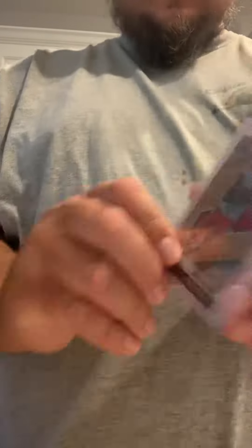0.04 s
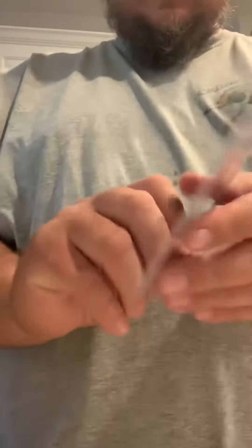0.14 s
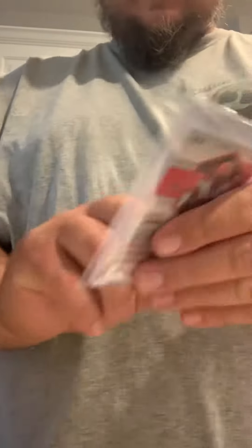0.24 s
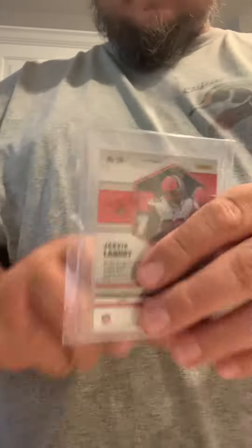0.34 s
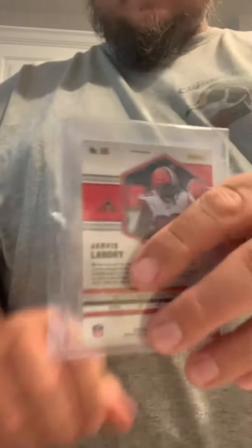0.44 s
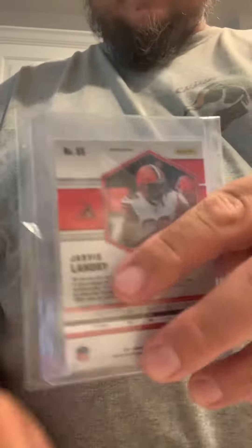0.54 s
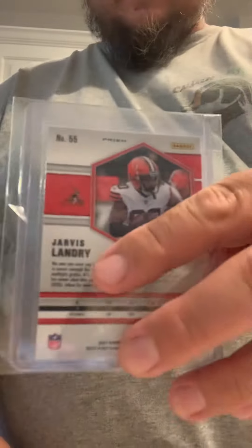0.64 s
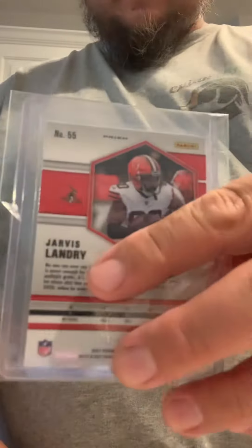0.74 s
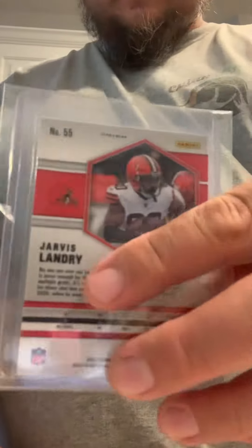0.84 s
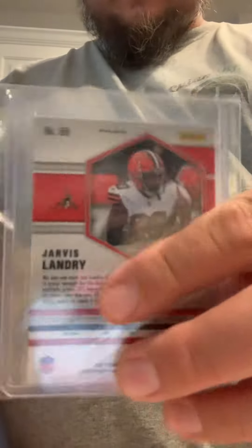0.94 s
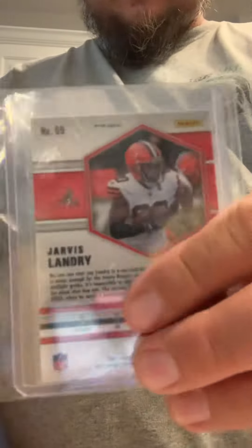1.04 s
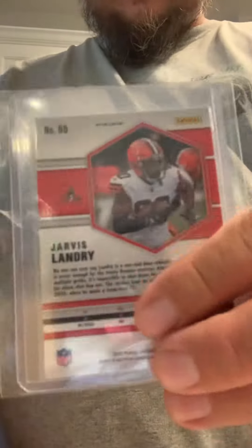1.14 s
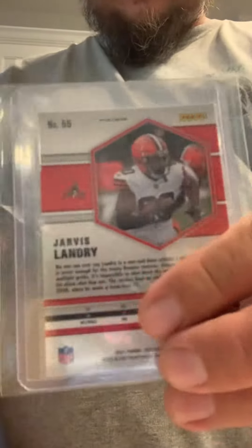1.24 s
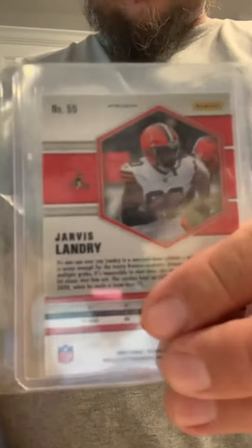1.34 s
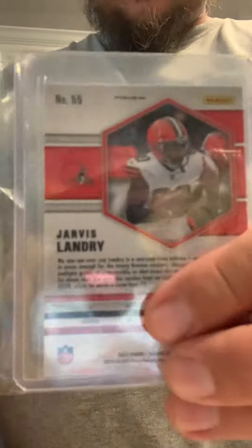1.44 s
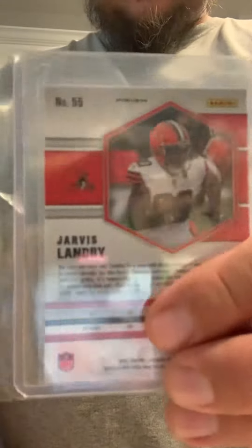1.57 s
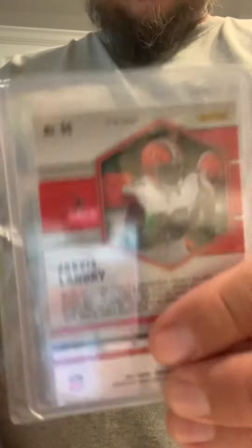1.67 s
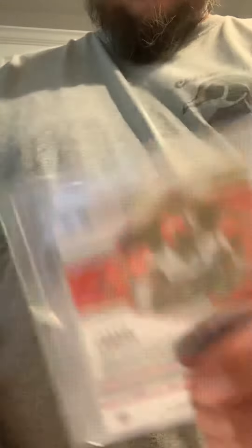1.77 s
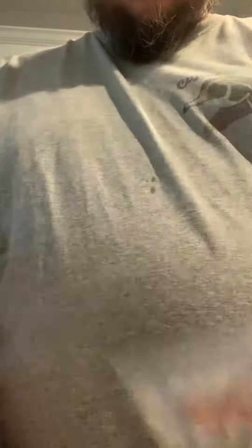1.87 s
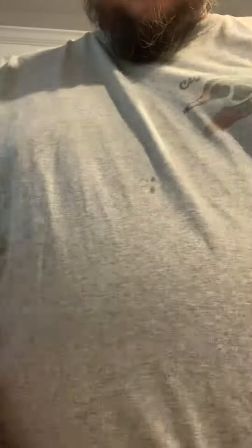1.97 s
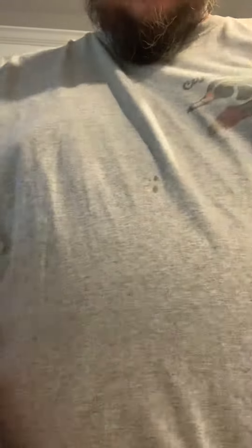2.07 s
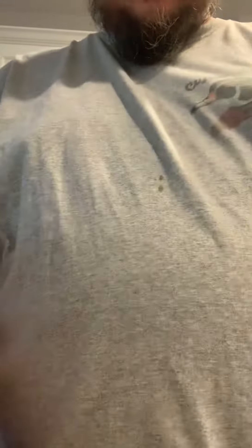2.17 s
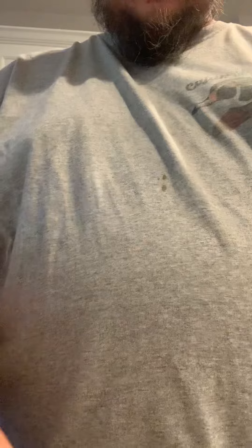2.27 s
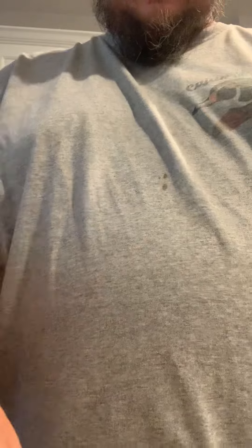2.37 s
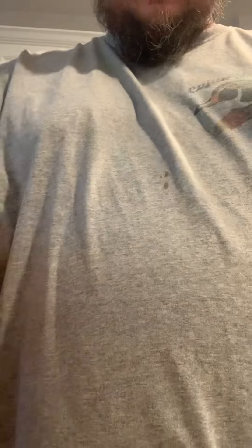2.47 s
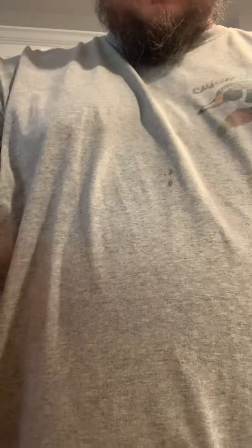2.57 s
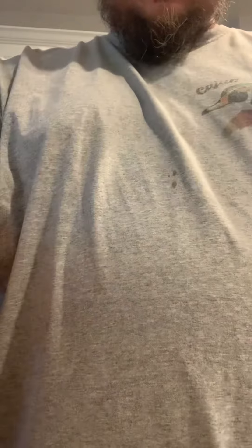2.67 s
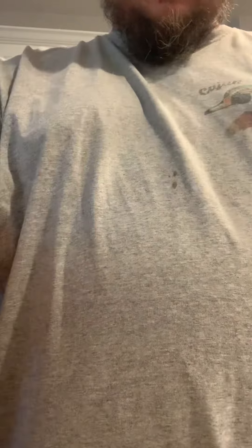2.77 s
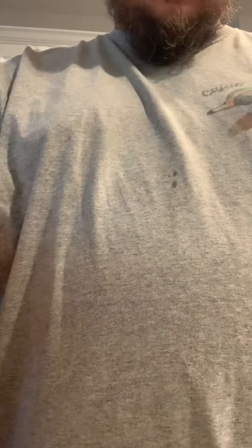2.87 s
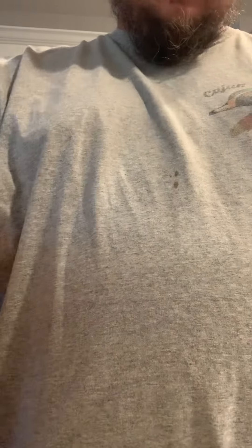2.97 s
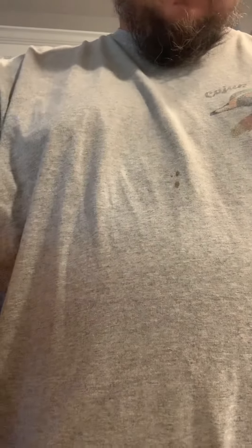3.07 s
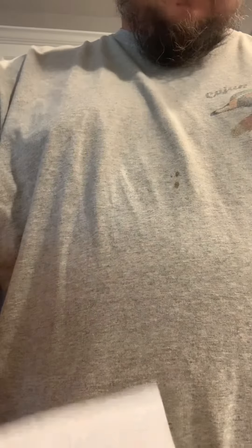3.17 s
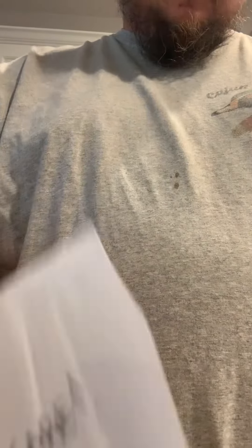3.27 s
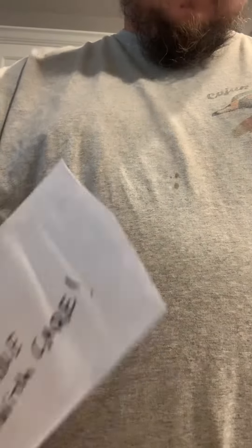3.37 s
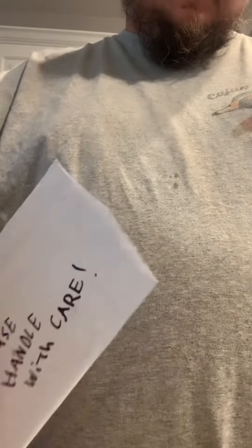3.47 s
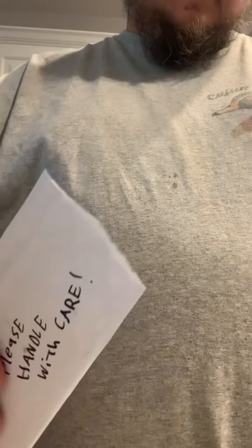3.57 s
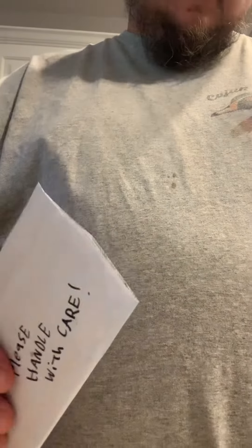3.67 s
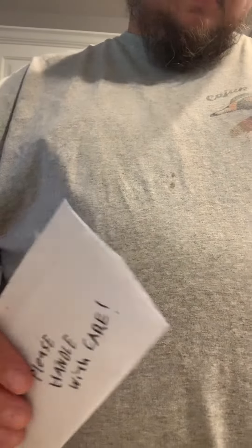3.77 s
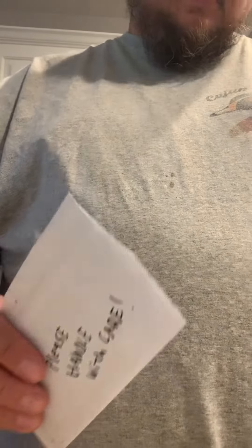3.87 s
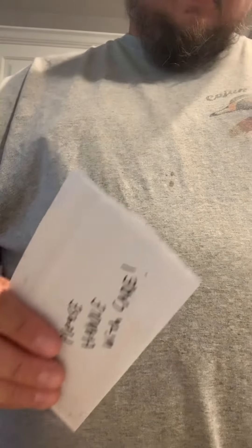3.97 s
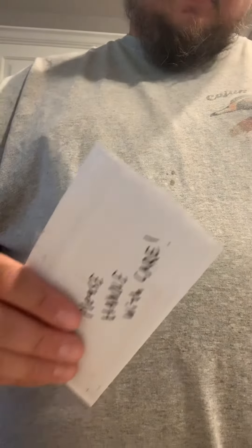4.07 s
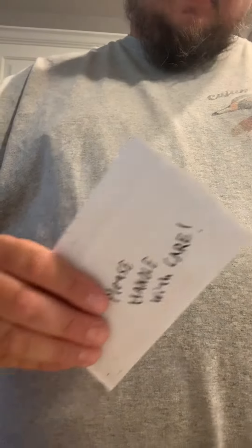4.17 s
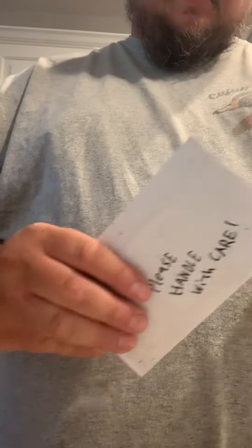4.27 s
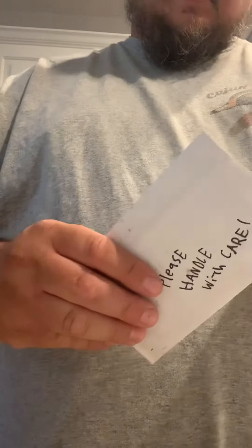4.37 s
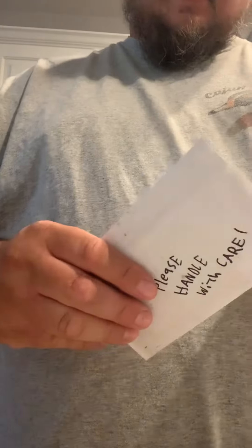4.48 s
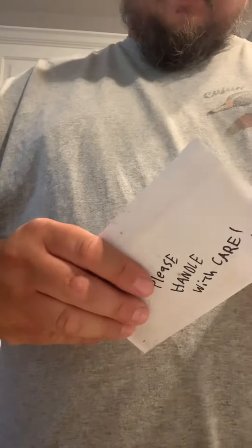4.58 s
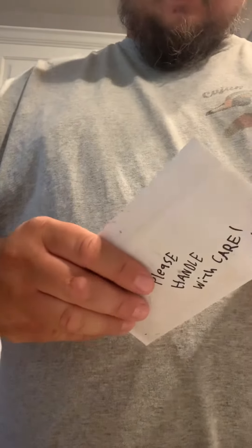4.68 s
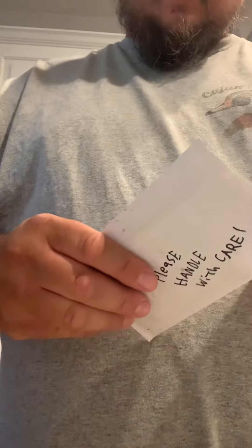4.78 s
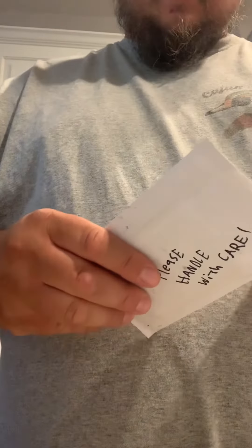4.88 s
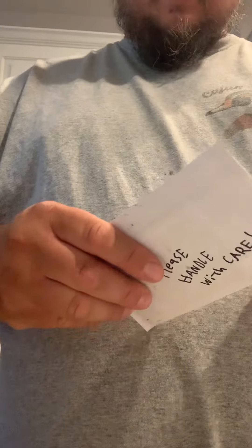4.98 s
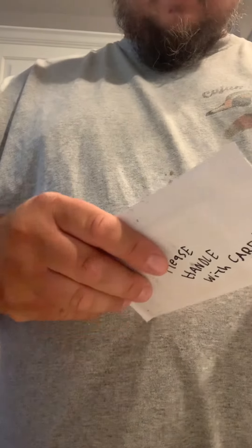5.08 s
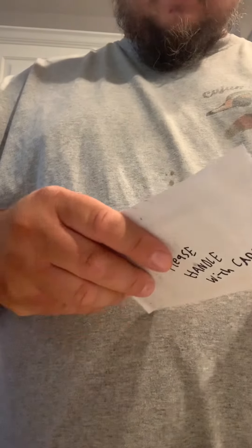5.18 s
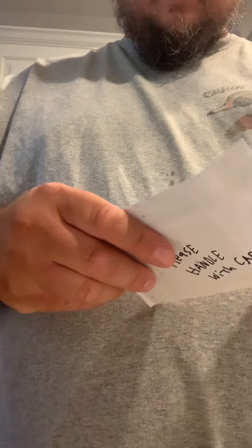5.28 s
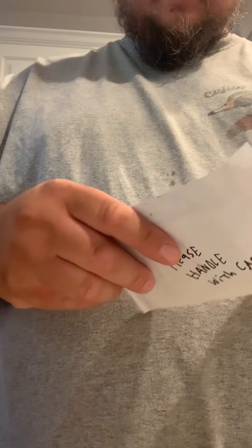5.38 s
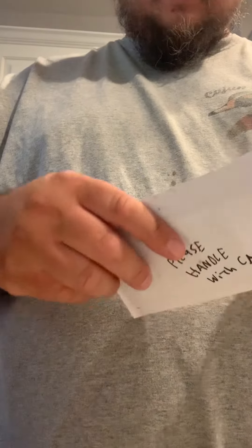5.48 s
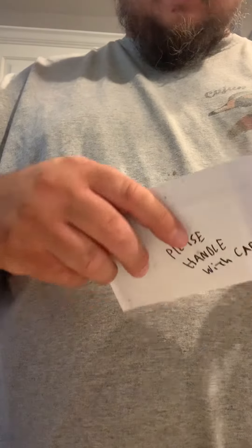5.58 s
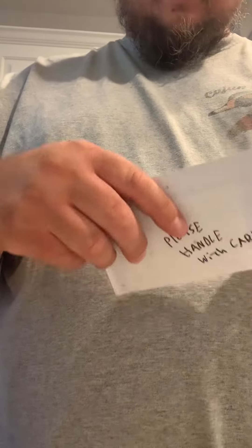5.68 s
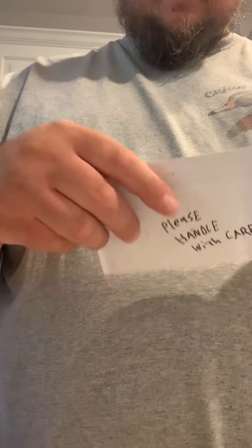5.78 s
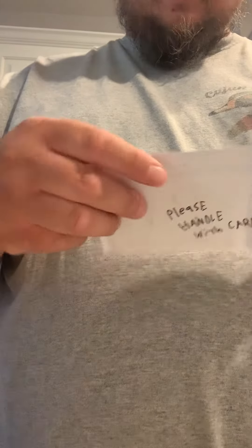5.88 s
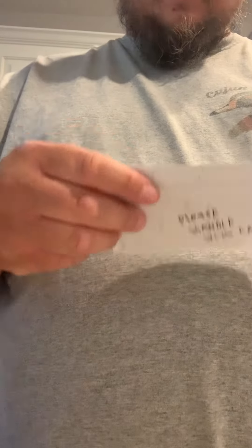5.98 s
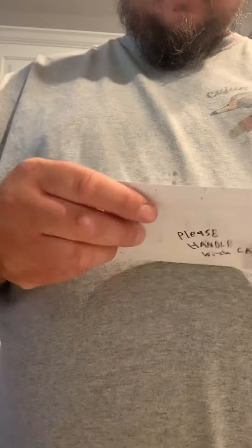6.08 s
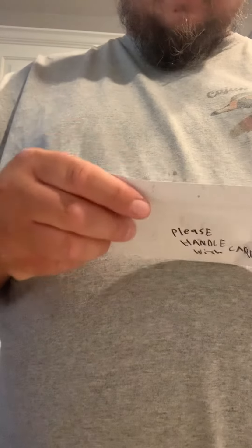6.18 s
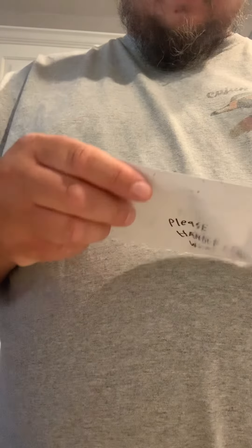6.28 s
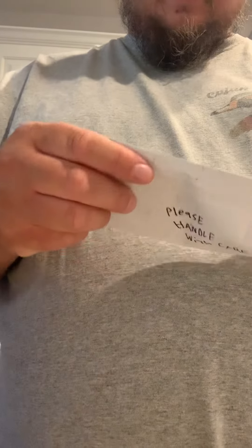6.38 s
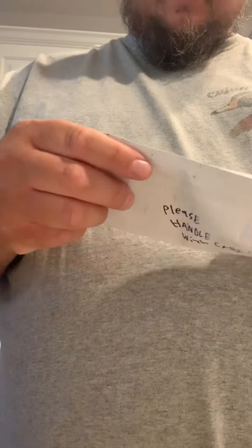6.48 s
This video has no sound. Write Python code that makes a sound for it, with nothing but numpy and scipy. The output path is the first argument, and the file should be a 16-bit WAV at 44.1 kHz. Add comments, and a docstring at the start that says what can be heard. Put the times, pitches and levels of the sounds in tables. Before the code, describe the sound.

Handheld phone close to the hands, indoors. Quick small plastic clicks come first, then near silence and a faint put-down bump. Paper rustles and slides as an envelope is lifted, then pauses with only tiny ticks. Finally the stiff paper crackles, scrapes and pops much louder, cut off mid-crinkle. Soft air noise and a faint low hum, very short room reverberation.

```python
"""Close to a phone in a quiet room, hands turn a card in a stiff plastic sleeve (hiss, sharp ticks) and put it down.
They pick up a paper envelope, slide along it, then start to pull it open: friction noise under stroke gains,
snaps built of crack, flex and ring, and random small buckles for crackle.
Soft bumps (resonant noise plus a damped push), wall reverberation and a low hum with air noise lie beneath."""
import sys
import numpy as np
from scipy import signal
from scipy.fft import rfft, irfft, next_fast_len
from scipy.io import wavfile
from scipy.ndimage import uniform_filter1d, map_coordinates

SR = 44100
rng = np.random.default_rng(int(sys.argv[2]) if len(sys.argv) > 2 else 0)


def store_pcm(level_fs):
    """Save levels as 16-bit WAV."""
    pcm = np.round(np.clip(level_fs, -1, 1) * 32767).astype(np.int16)
    wavfile.write(sys.argv[1], SR, np.atleast_2d(pcm).T)


N = 287532

# Stroke, snap and room levels are before trims; bump peaks have none. Spectra are relative.
# taut envelope modes: f/Hz, width/Hz, level/dB
ENVELOPE_MODES = [(85, 87, -8), (186, 270, -6.5), (397, 130, -2), (766, 250, -3.5), (1290, 250, -2.5),
                  (1785, 290, -3.5), (1995, 260, -1), (2480, 530, -2), (3530, 1470, -5)]
# grips on the envelope: start t/s, mode frequency scale, bulge f/Hz, bulge level/dB, rustle trim level/dB
GRIPS = [(5.26, 1.01, 1900, 5.5, -1.5), (5.78, 1.0, 1290, -1.5, -1), (6.245, 1.029, 1690, 6, -1.5)]
# finger strokes on envelope, on sleeve: start t/s, length t/s, hiss level/dB, rustle level/dB, swell over stroke/dB
PAPER_STROKES = [(2.49, 0.03, -62, -59.5, 17), (2.548, 0.043, -56, -51, 17.5),
                 (2.585, .14, -59.5, -54.5, -20), (2.74, 0.09, -65.5, -53, 19),
                 (2.84, 0.21, -61, -57.5, 21), (3.06, 0.098, -52, -53.5, 6.5),
                 (3.17, 0.041, -51.5, -56, 11.5), (3.22, 0.17, -55, -57, -0.5),
                 (3.41, 0.2, -57.5, -64, 1.5), (3.56, 0.05, -49, -56, 4), (3.62, 0.13, -54.5, -53, -3.5),
                 (3.76, 0.2, -56, -55.5, 3), (4.29, 0.062, -80, -65.5, 21), (4.465, 0.028, -63, -59, -3.5),
                 (4.6, 0.037, -70, -61.5, -3), (4.764, 0.015, -66, -61.5, 0), (4.92, 0.33, -70, -68, 3),
                 (5.265, 0.088, -60.5, -60.5, 25.5), (5.355, 0.12, -53, -50, 0), (5.5, .15, -54.5, -55, -4),
                 (5.7, 0.11, -59.5, -65.5, 5), (5.806, 0.068, -48, -53.5, -23),
                 (5.885, 0.075, -48.5, -54, -0.5), (5.955, 0.025, -42.5, -44.5, 15),
                 (5.997, 0.095, -49.5, -48, -3), (6.1, 0.058, -47, -43.5, 0),
                 (6.17, 0.059, -52, -51.5, -5.5), (6.257, 0.047, -41, -40.5, 0),
                 (6.31, 0.061, -52.5, -48.5, -3.5), (6.397, 0.11, -56.5, -52, 1),
                 (6.476, 0.029, -38, -31.5, 6.5)]
SLEEVE_STROKES = [(0.0, 0.025, -55, -50, -9.5), (.055, 0.073, -62.5, -57.5, 7),
                  (.14, 0.083, -67.5, -64.5, -2), (.21, 0.042, -55.5, -58.5, 7),
                  (.26, 0.085, -66, -70.5, -10), (.41, 0.048, -74.5, -75.5, 7),
                  (.54, 0.085, -71, -74.5, -4), (.89, 0.035, -64.5, -84, 1),
                  (.95, 0.067, -67.5, -78.5, 10.5), (1.58, 0.11, -74.5, -75, 13.5),
                  (1.745, 0.057, -67, -79, 3), (1.805, 0.043, -58.5, -71, 9), (2.04, 0.2, -72.5, -72, 8),
                  (2.245, 0.19, -64, -62.5, 0)]
# paper buckles, the first two rows being last ticks of the sleeve: t/s, crack level/dB, flex level/dB, flex
# f/Hz, sheet ring level/dB, crack t60/s
PAPER_SNAPS = [(2.497, -48, -70, 3000, -70, 0.015), (2.5075, -46, -47, 3720, -64, 0.012),
               (2.521, -45, -58, 1290, -56, 0.006), (2.5805, -54, -34, 2380, -51, .008),
               (2.6325, -45, -43, 1010, -53, 0.0072), (2.7285, -70, -51.5, 1070, -51, .008),
               (3.031, -39, -52, 1700, -52, .005), (3.052, -62, -42.5, 1120, -47, .008),
               (3.213, -48, -42.5, 2300, -50, 0.0029), (3.3544, -39, -52, 2560, -71, 0.0065),
               (3.738, -60, -56, 1291, -42, 0.0056), (4.4529, -51.5, -70, 2501, -70, 0.0035),
               (4.7771, -38, -55, 1570, -57, 0.0044), (5.375, -40, -47, 2400, -43, 0.011),
               (5.386, -48, -40, 2020, -44, 0.0091), (5.4725, -57, -49, 1310, -40, 0.0066),
               (5.489, -61, -46, 1900, -38.5, 0.0055), (5.5117, -56, -41, 856, -37.5, .008),
               (5.527, -60, -52, 1510, -35.5, 0.009), (5.552, -56, -52, 1900, -54, .005),
               (5.608, -45, -46, 1650, -41.5, 0.0059), (5.653, -68, -64, 1800, -44, 0.0067),
               (5.6748, -64, -36.5, 580, -46, 0.005), (5.803, -32, -31, 1230, -34, 0.0084),
               (5.8096, -19.5, -30, 3160, -27.5, 0.022), (5.8198, -16.5, -23, 3000, -28, 0.0053),
               (5.9765, -28.5, -36, 3000, -43, .008), (5.9809, -14, -21, 2150, -24.5, 0.0078),
               (5.9922, -6.5, -22, 2440, -22.5, 0.011), (6.1281, -41, -27.5, 2030, -42, .01),
               (6.161, -44.5, -36, 1390, -36.5, .008), (6.2489, -35.5, -36, 2530, -41, 0.015),
               (6.274, -27, -36, 1900, -34, 0.012), (6.294, -45, -40, 1900, -27.5, 0.0089),
               (6.3072, -32, -18.5, 1470, -28.5, .008), (6.3095, -31, -28.5, 1670, -31, 0.011),
               (6.467, -41, -15, 1600, -33.5, 0.0097), (6.5008, -44, -22, 2000, -35, .008)]
# sleeve ticks on fingers and card: t/s, crack level/dB, flex level/dB, flex f/Hz, crack t60/s
SLEEVE_TICKS = [(.0544, -44, -43.5, 2260, 0.0097), (.0929, -45, -44, 1410, 0.014),
                (0.1257, -54, -47, 2020, 0.012), (0.2107, -36, -40.5, 2550, .006),
                (0.239, -44, -41.5, 2880, 0.0096), (0.2511, -36, -43, 3070, 0.0083),
                (0.2709, -34.5, -44, 2720, 0.0086), (.546, -71, -55, 860, .008),
                (0.6138, -75, -59, 2050, 0.0084), (0.8073, -66, -62, 2270, 0.0049),
                (0.8935, -47.5, -52, 2310, 0.0027), (1.1683, -81, -54, 2040, 0.006),
                (1.2383, -72, -87, 3000, .004), (2.1286, -51, -61, 2650, .008),
                (2.168, -59.5, -75, 2500, 0.0092), (2.3967, -37.5, -41.5, 2790, 0.0024)]
# soft bumps of hands and sheet: t/s, peak level/dB, f/Hz, t60/s
BUMPS = [(0.0, -36.5, 62, 0.061), (0.55, -46, 133, 0.35), (2.136, -46, 69.6, 0.3),
         (2.261, -52.5, 114, 0.55), (2.397, -39.5, 139, 0.055), (2.525, -50, 48.3, 0.15),
         (3.031, -51, 72.5, 0.53), (5.519, -45.5, 85, 0.38), (5.559, -42, 360, 0.13),
         (5.608, -43.5, 335, 0.04), (5.821, -41, 200, 0.061), (5.918, -36.5, 206, 0.074),
         (5.994, -28, 382, 0.07), (6.165, -33.5, 183, 0.032), (6.289, -37, 186, 0.1),
         (6.506, -43, 240, 0.069)]
# spectra of rubbed surface, paper crack, plastic crack: f/Hz, level/dB
SURFACE_SPECTRUM = [(2000, -28.5), (3500, -11), (4500, -8.5), (5300, -1.5), (6300, 2), (7500, -2),
                    (8800, 0.5), (10300, -3.5), (11200, -8), (12300, -18), (14800, -22), (16000, -23)]
PAPER_CRACK_SPECTRUM = [(300, -27), (2000, -15.5), (3000, -27), (3600, -6), (5000, -11), (6500, -7),
                        (8000, -7), (8900, -1), (9700, -5), (11000, -14), (14000, -22.5), (16000, -31)]
PLASTIC_CRACK_SPECTRUM = [(300, -36), (2500, -15.5), (4300, -12.5), (6200, -4.5), (7100, -4.5),
                          (8400, -3.5), (10300, -0.5), (11800, -7), (14000, -15), (16000, -17)]
# spectra of the loose bodies: sheet at pick-up, lifted envelope, sleeve: f/Hz, level/dB
SHEET_SPECTRUM = [(60, -2.5), (200, -8), (400, -7), (600, -2.5), (850, -6), (1080, 3), (1300, -5),
                  (1600, 4), (1900, -8.5), (2400, 1), (3000, -8.5), (3800, -8.5), (6500, -2.5),
                  (12000, -32)]
ENVELOPE_SPECTRUM = [(60, -10), (200, -10), (450, 5.5), (580, 2.5), (780, 6), (1020, -7.5), (1250, 2.5),
                     (1650, 2), (2050, 1), (2800, 4.5), (4200, -9), (12000, -42)]
SLEEVE_SPECTRUM = [(60, -11), (220, -1), (450, 2), (600, -4), (780, 0.5), (1030, -15.5), (1300, -3),
                   (1700, -5), (2300, -3), (3500, -10), (4300, -6), (12000, -30)]
# left-right likeness of loose rubbing, taut envelope, snaps (one spot), room air: f/Hz, likeness (0-1)
PAPER_ALIKE = [(200, 1), (700, 0.29), (1500, 0.1), (3500, 1), (5000, 1), (15000, 1)]
TAUT_ALIKE = [(200, 1), (700, 0.86), (1500, 0.66), (3500, 0.85), (5000, 1)]
SNAP_ALIKE = [(200, 0.98), (1500, 0.7), (5000, 0.95)]
ROOM_ALIKE = [(50, 0.93), (200, 0.6), (500, 0.052), (1500, 0.059)]
# lag of left behind right: f/Hz, lag t/s
PORT_LAG = [(400, 0.00029), (1200, 0.000076), (2400, 0.0001), (3500, 0.000065), (4600, 0.00011),
            (9000, 0.00012)]
# wall reverberation: f/Hz, t60/s
WALLS_T60 = [(200, 0.76), (2000, 0.28), (10000, 0.02)]
# ventilation spectrum: f/Hz, level/dB
AIR_SPECTRUM = [(15, -65), (25, -16), (48, -9.5), (108, -2), (146, -6.5), (188, 1.5), (253, -5), (320, -3),
                (348, -22), (387, -11.5), (579, -17), (814, -29.5), (1010, -29.5), (2250, -33), (4000, -48),
                (5200, -63), (8800, -120)]
# hum partials: f/Hz, rms level/dB
HUM = [(98.5, -82), (197, -71), (314, -78)]

REACH_S, LIFT_S = 2.47, 3.26  # envelope reached for, then lifted
ATTACK_S, RELEASE_T60_S = 0.0047, 0.11
ATTACK_SHARE = 0.031  # of stroke length, added to the attack
LET_GO_DB = 18.5  # each rising swell of this size halves the release: a loaded finger slips off at once
LEAD_S = .004  # short faint rise before each snap
FLIP_CYCLES, FLIP_SAG, FLIP_CLEAN = 0.9, 0.23, 0.41  # cycles to widest swing, pitch sag (0-1), clean power share
ROOM_DB = -67.5
TOP_HZ = 16000


def opening(gains):
    """Fingers rub the taut envelope; each grip sets its own mode scale and bulge."""
    ends_s = [row[0] for row in GRIPS[1:]] + [N / SR]
    out = np.zeros((2, N))
    for (start_s, scale, bulge_hz, bulge_db, rustle_db), end_s in zip(GRIPS, ends_s):
        sheet = taut_sheet(scale, bulge_hz, bulge_db)
        out += rub(gains, (start_s, end_s), sheet, TAUT_ALIKE, hiss_db=0.0, sheet_db=rustle_db,
                   grain_share=0.33, judder_db=1.5)
    return out


def taut_sheet(scale, bulge_hz, bulge_db):
    """Gain of a stretched sheet: power sum of a few wide modes, one range favoured."""
    def gain(f):
        power = 0
        for hz, width_hz, db in ENVELOPE_MODES:
            mode = amp(db) * resonance(f, hz * scale, hz / width_hz) ** 2
            power = power + np.abs(mode) ** 2
        bulge = amp(bulge_db * np.abs(resonance(f, bulge_hz, 2.1)) ** 2)
        return np.sqrt(power / (1 + (f / 4500) ** 4)) * bulge
    return gain


def loose_sheet(spectrum):
    """Gain of a slack sheet: a broad fixed colour."""
    return lambda f: amp(along(spectrum, f))


def pressure(strokes, resting_hiss_db, resting_sheet_db):
    """Hiss and rustle gains: attack, sloping hold and release per stroke, over the creep of a resting grip."""
    power = amp([[resting_hiss_db], [resting_sheet_db]]) ** 2 * np.ones(N)
    age_s = np.arange(min(N, SR)) / SR
    for start_s, length_s, hiss_db, sheet_db, swell_db in strokes:
        attack_s = ATTACK_S + ATTACK_SHARE * length_s
        attack = np.sin(np.pi / 2 * np.minimum(age_s / attack_s, 1)) ** 2
        hold_db = swell_db * (np.minimum(age_s / length_s, 1) - .5)
        release_t60_s = RELEASE_T60_S * 2 ** (-max(swell_db, 0) / LET_GO_DB)
        release_db = -60 * np.maximum(age_s - length_s, 0) / release_t60_s
        stroke = amp([[hiss_db], [sheet_db]]) * attack * amp(hold_db + release_db)
        add(power, start_s, stroke ** 2)
    return np.sqrt(power)


def rub(gains, span_s, sheet, alike, hiss_db, sheet_db, grain_share, judder_db):
    """Rubbing over one span: the surface hisses evenly, the sheet scrapes with sparser slips."""
    start_s, end_s = span_s
    hiss, body = gains[:, round(start_s * SR):round(end_s * SR)]
    surface = friction(len(hiss), loose_sheet(SURFACE_SPECTRUM), alike, 3000, grain_share,
                       0.45 * judder_db, patchy_db=3.0)
    scrape = friction(len(body), sheet, alike, 380, grain_share, judder_db, patchy_db=4.0)
    out = np.zeros((2, N))
    add(out, start_s, amp(hiss_db) * hiss * surface + amp(sheet_db) * body * scrape)
    return out


def friction(n, colour, alike, grain_rate_hz, grain_share, judder_db, patchy_db):
    """Fibres catch and let go: sparse slips on a dense hiss, under an unsteady finger."""
    sizes = amp(3.8 * np.clip(rng.standard_normal(n), -2, 1.5)) * rng.choice([-1, 1], (2, n))
    clumps = amp(7 * np.clip(wobble(45, n), -1.5, 1.5))  # slips come in runs
    slips = (rng.random(n) < clumps * grain_rate_hz / SR) * sizes
    share = np.clip(grain_share, 0, 1)
    drive = np.sqrt(share) * unit(slips) + np.sqrt(1 - share) * rng.standard_normal((2, n))
    judder = amp(judder_db * (wobble(60.1, n) + wobble(260, n)))
    drive = patches(drive, patchy_db) * judder
    return unit(stereo(filtered(drive, lambda f: causal(colour(f))), alike))


def patches(x, depth_db):
    """Resonances come and go: a smooth random gain over time and frequency."""
    z = signal.stft(x, nperseg=512)[2]
    field = rng.standard_normal(z.shape[1:])
    field = uniform_filter1d(field, size=3, axis=0)
    field = uniform_filter1d(field, size=7, axis=1)
    return signal.istft(z * amp(depth_db * unit(field)), nperseg=512)[1][:, :x.shape[-1]]


def snaps(table, crack_colour, sheet, flex_t60_s, ring_t60_s, rise_share, flex_q,
          crack_trim_db, flex_trim_db, ring_trim_db):
    """Each buckle: a bright crack, a hollow pop of the flipping patch, a short ring of the whole sheet."""
    out = np.zeros((2, N))
    clean = np.clip(FLIP_CLEAN, 0, 1)
    for t_s, crack_db, flex_db, flex_hz, ring_db, t60_s in table:
        rise_s = rise_share * t60_s
        crack = burst(t60_s, rise_s, lambda f: causal(amp(along(crack_colour, f))))
        rough = burst(flex_t60_s, rise_s, lambda f: resonance(f, flex_hz, flex_q) ** 2)
        flex = np.sqrt(clean) * flip(flex_hz) + np.sqrt(1 - clean) * rough
        ring = burst(ring_t60_s, rise_s, lambda f: causal(sheet(f)) / (1 + 1j * f / 1700))
        snap = amp(crack_db + crack_trim_db) * crack
        snap = snap + amp(flex_db + flex_trim_db) * flex
        snap = snap + amp(ring_db + ring_trim_db) * ring
        add(out, t_s - LEAD_S, snap)
    return out


def burst(t60_s, rise_s, response):
    """A faint rise of noise, then a sharp onset and decaying noise; energy equals rms 1 over 6 ms."""
    t = np.arange(SR // 16) / SR - LEAD_S
    after = np.maximum(t, 0)
    lead_in = amp(-19.5 + 24 * t / LEAD_S) * (t < rise_s)
    decay = amp(-60 * after / max(t60_s, .001)) * (1 - np.exp(-after / rise_s))
    noise = rng.choice([-1, 1], (2, len(t))) * (lead_in + decay)
    sound = stereo(filtered(noise, response), SNAP_ALIKE)
    return sound / np.sqrt(np.sum(sound ** 2, axis=1, keepdims=True) / (.006 * SR))


def flip(hz):
    """A patch pops through: a few swings sagging in pitch as it relaxes; energy equals rms 1 over 6 ms."""
    age = np.maximum(np.arange(SR // 16) / SR - LEAD_S, 0) * hz / FLIP_CYCLES
    pitch_hz = hz * (1 + FLIP_SAG * (2 * np.exp(-age / 2) - 1)) * (age > 0)
    swing = age * np.exp(-age) * np.sin(2 * np.pi * np.cumsum(pitch_hz) / SR)
    return swing / np.sqrt(np.sum(swing ** 2) / (.006 * SR))


def crinkles(gains, count, centre_hz, spread_octaves, spread_db, t60_s):
    """Tiny buckles at random times, levels following the rubbing gains; rows as in PAPER_SNAPS."""
    t_s = rng.uniform(REACH_S, (N - 1) / SR, count)
    size, pitch = np.clip(rng.standard_normal((count, 2)), -1.5, 1.5).T
    gains_db = 20 * np.log10(gains[:, (t_s * SR).astype(int)])
    hiss_db, sheet_db = gains_db + spread_db * size
    flex_hz = centre_hz * 2 ** (spread_octaves * pitch)
    return np.transpose([t_s, hiss_db, sheet_db, flex_hz, sheet_db, np.full(count, t60_s)])


def bumps(rise_s, blow_db):
    """Soft contacts: one dull push, plus a rumble as the hand settles."""
    out, t = np.zeros((2, N)), np.arange(SR // 3) / SR
    for t_s, peak_db, hz, t60_s in BUMPS:
        envelope = amp(-60 * t / t60_s) * (1 - np.exp(-t / rise_s))
        noise = rng.standard_normal(len(t)) * envelope
        settle = unit(filtered(noise, lambda f: resonance(f, hz, 0.76) ** 2))
        push = unit(np.sin(2 * np.pi * hz * t) * t * np.exp(-1.6 * hz * t))
        thud = settle + amp(blow_db - 20 * t60_s) * push
        add(out, t_s, amp(peak_db) * thud / np.abs(thud).max())
    return out


def ports(x):
    """Hands work a little to the right: their sound reaches the left port later."""
    sides = np.array([[-1], [1]])  # half the lag each way
    return filtered(x, lambda f: np.exp(1j * np.pi * f * along(PORT_LAG, f) * sides))


def walls(x):
    """The small room answers briefly: decaying noise, treble dying first."""
    hz, t, z = signal.stft(rng.standard_normal((2, SR // 3)), SR, nperseg=256)
    decay = amp(-60 * t / along(WALLS_T60, hz)[:, None])
    tail = signal.istft(z * decay, SR, nperseg=256)[1]
    tail = np.pad(tail, ((0, 0), (SR // 250, 0)))  # 4 ms pre-delay
    return signal.fftconvolve(x, tail / np.linalg.norm(tail[0]), axes=1)[:, :N]


def room_tone(air_db, hum_db, hiss_db, drift_rad):
    """Low ventilation noise, a phase-wavering hum and a trace of white hiss."""
    air = rng.standard_normal((2, N)) * amp(1.3 * wobble(7.6))
    air = unit(stereo(filtered(air, lambda f: amp(along(AIR_SPECTRUM, f))), ROOM_ALIKE))
    t = np.arange(N) / SR
    hum = np.zeros(N)
    for hz, db in HUM:
        tone = np.sin(2 * np.pi * hz * t + drift_rad * wobble(13.0))
        hum += amp(db + hum_db) * unit(tone)
    return amp(ROOM_DB + air_db) * air + hum + amp(hiss_db) * rng.standard_normal((2, N))


def amp(db):
    """Decibels to gain."""
    return 10 ** (np.asarray(db) / 20)


def unit(x):
    """Scale to rms 1."""
    return x / np.sqrt(np.mean(x ** 2) + 1e-20)


def along(points, hz):
    """Interpolate (f/Hz, value) points on a log frequency axis."""
    f, v = np.transpose(points)
    return np.interp(np.log(hz + 1), np.log(f + 1), v)


def wobble(rate_hz, n=N):
    """Smooth random curve of n samples, rate_hz knots a second."""
    knots = rng.standard_normal(int(n * rate_hz / SR) + 4)
    return map_coordinates(knots, [np.arange(n) * rate_hz / SR])


def filtered(x, response):
    """Apply a complex frequency response, zero-padded."""
    n = x.shape[-1]
    m = 2 * next_fast_len((n + min(n, 8192)) // 2 + 1)
    return irfft(rfft(x, m) * response(np.fft.rfftfreq(m, 1 / SR)), m)[..., :n]


def causal(gain):
    """Minimum-phase response of this gain, by folded cepstrum: it rings only after the blow."""
    cepstrum = irfft(np.log(gain + 1e-6))
    half = len(cepstrum) // 2
    folded = np.r_[cepstrum[0], 2 * cepstrum[1:half], cepstrum[half]]
    return np.exp(rfft(folded, len(cepstrum)))


def resonance(f, hz, q):
    """Response of a damped mode at hz."""
    return 1j * f * hz / q / (hz * hz - f * f + 1j * f * hz / q)


def stereo(pair, alike):
    """Blend two signals into left and right; unrelated inputs get the given likeness."""
    def mid_side(f):
        turn = np.arccos(np.clip(along(alike, f), -1, 1)) / 2
        return np.array([np.cos(turn), np.sin(turn)])
    mid, side = filtered(pair, mid_side)
    return np.array([mid + side, mid - side])


def add(track, t_s, sound):
    """Mix a sound in at t_s."""
    part = track[:, max(round(t_s * SR), 0):][:, :sound.shape[-1]]
    part += sound[..., :part.shape[-1]]


def scene():
    """The sleeve is turned and put down; the envelope is picked up, lifted and pulled open."""
    on_sleeve = pressure(SLEEVE_STROKES, resting_hiss_db=-85.5, resting_sheet_db=-87.0)
    on_paper = pressure(PAPER_STROKES, resting_hiss_db=-82.5, resting_sheet_db=-78.5)
    paper = taut_sheet(scale=1.0, bulge_hz=790, bulge_db=3.0)

    sleeve = rub(on_sleeve, (0, REACH_S), loose_sheet(SLEEVE_SPECTRUM), PAPER_ALIKE,
                 hiss_db=-0.5, sheet_db=-2.5, grain_share=0.45, judder_db=0.35)
    # before trims, the sleeve rings as hard as it flexes
    tick_rows = [(t_s, crack_db, flex_db, hz, flex_db, t60_s)
                 for t_s, crack_db, flex_db, hz, t60_s in SLEEVE_TICKS]
    ticks = snaps(tick_rows, PLASTIC_CRACK_SPECTRUM, loose_sheet(SLEEVE_SPECTRUM),
                  flex_t60_s=0.013, ring_t60_s=0.034, rise_share=0.082, flex_q=1.6,
                  crack_trim_db=-1, flex_trim_db=-5.5, ring_trim_db=-18.0)

    pick_up = rub(on_paper, (REACH_S, LIFT_S), loose_sheet(SHEET_SPECTRUM), PAPER_ALIKE,
                  hiss_db=-2.5, sheet_db=-2.5, grain_share=0.41, judder_db=-0.1)
    lift = rub(on_paper, (LIFT_S, GRIPS[0][0]), loose_sheet(ENVELOPE_SPECTRUM), PAPER_ALIKE,
               hiss_db=0.0, sheet_db=-5.5, grain_share=0.31, judder_db=0.13)
    buckles = snaps(PAPER_SNAPS, PAPER_CRACK_SPECTRUM, paper,
                    flex_t60_s=0.02, ring_t60_s=0.036, rise_share=0.03, flex_q=1.8,
                    crack_trim_db=-9.5, flex_trim_db=-9.5, ring_trim_db=-9.0)
    small_buckles = crinkles(on_paper, count=160, centre_hz=1440, spread_octaves=0.6,
                             spread_db=4.0, t60_s=0.0049)
    crackle = snaps(small_buckles, PAPER_CRACK_SPECTRUM, paper,
                    flex_t60_s=0.023, ring_t60_s=0.0089, rise_share=0.035, flex_q=1.27,
                    crack_trim_db=-6, flex_trim_db=-14.5, ring_trim_db=-15.5)

    hands = sleeve + ticks + pick_up + lift + crackle + opening(on_paper) + buckles
    reverb = amp(-17.0) * walls(hands)
    background = room_tone(air_db=1.5, hum_db=-2.0, hiss_db=-89.5, drift_rad=0.94)
    return ports(hands) + bumps(rise_s=0.0018, blow_db=-0.5) + reverb + background


def record(dry):
    """The phone thins the deepest bass and falls off steeply at its band limit."""
    low_cut_hz = 28
    bass = lambda f: f ** 3 / np.sqrt(f ** 6 + low_cut_hz ** 6)
    treble = lambda f: (f < TOP_HZ) / np.sqrt(1 + (f / (.95 * TOP_HZ)) ** 40)
    return filtered(dry, lambda f: bass(f) * treble(f))


dry = scene()
out = record(dry)
store_pcm(out)
```